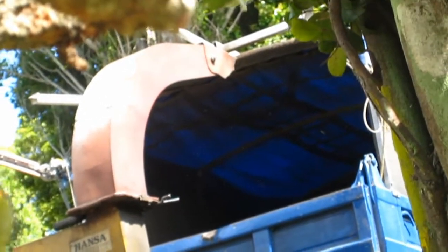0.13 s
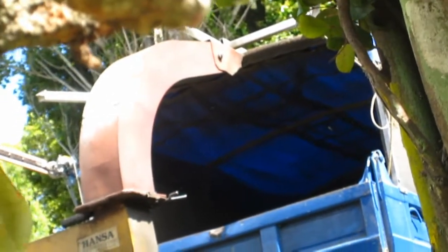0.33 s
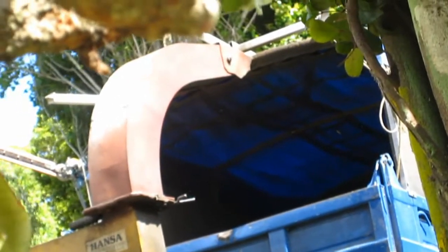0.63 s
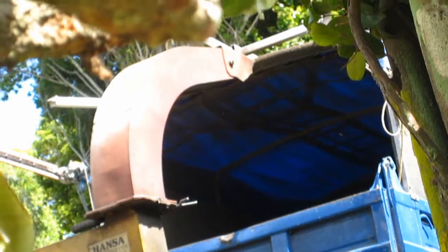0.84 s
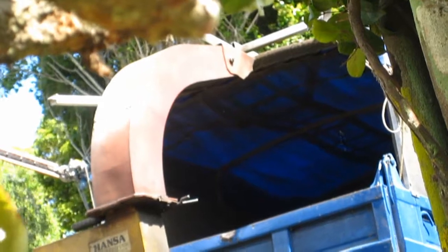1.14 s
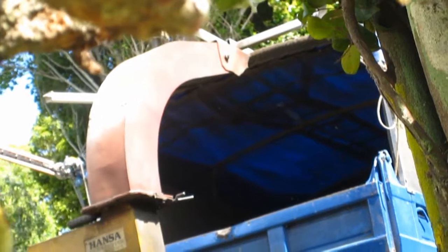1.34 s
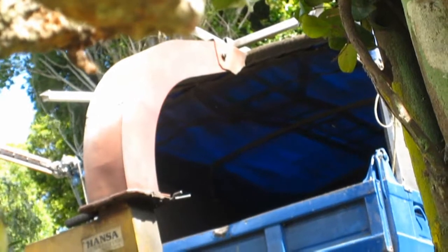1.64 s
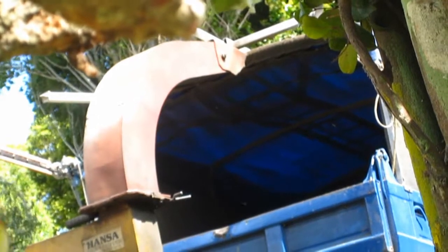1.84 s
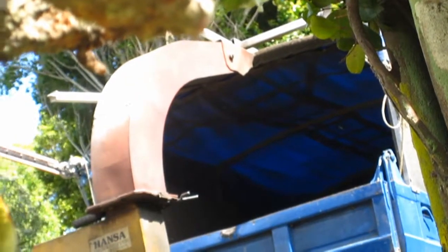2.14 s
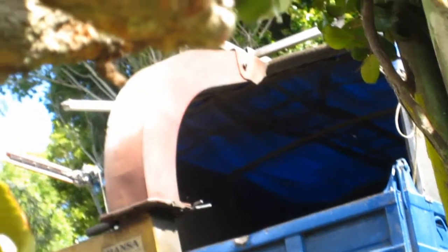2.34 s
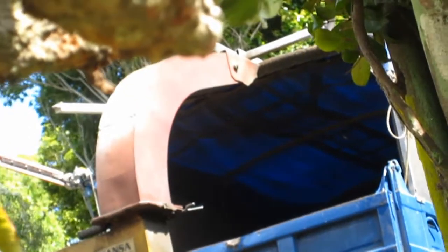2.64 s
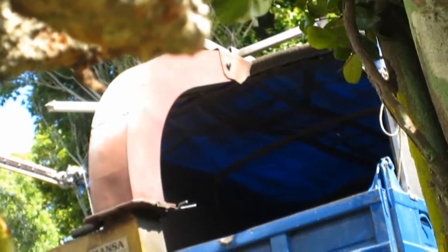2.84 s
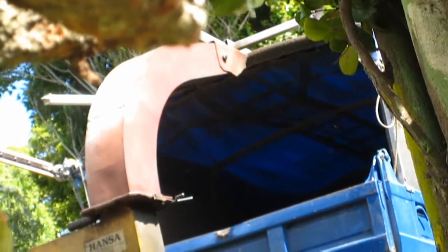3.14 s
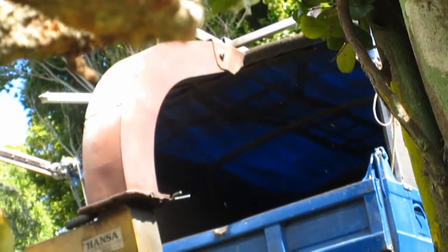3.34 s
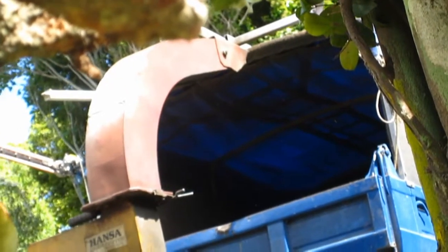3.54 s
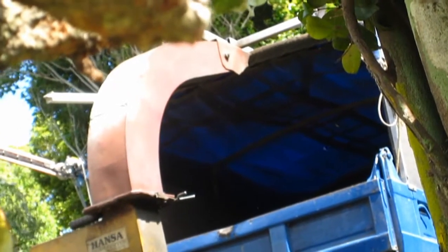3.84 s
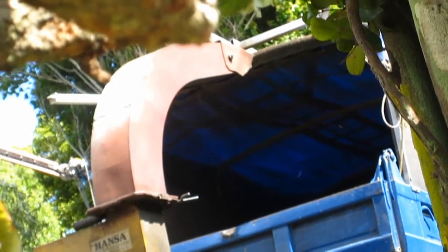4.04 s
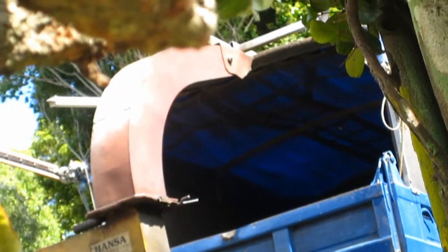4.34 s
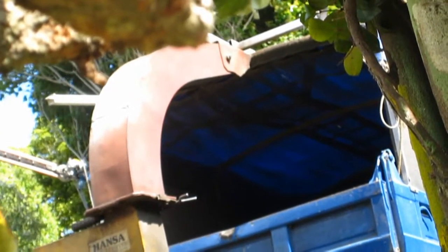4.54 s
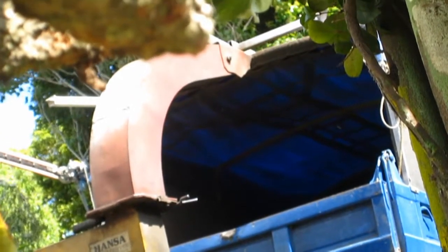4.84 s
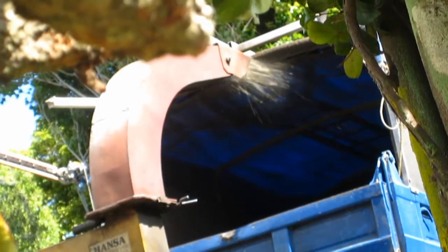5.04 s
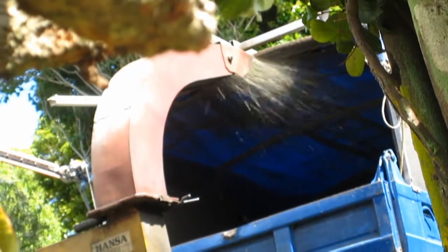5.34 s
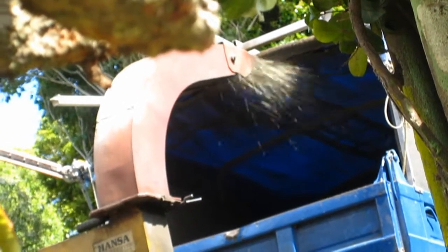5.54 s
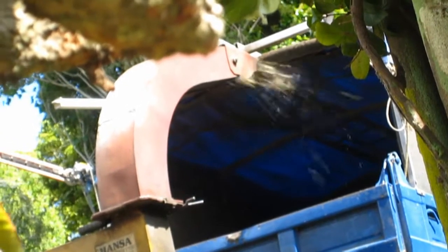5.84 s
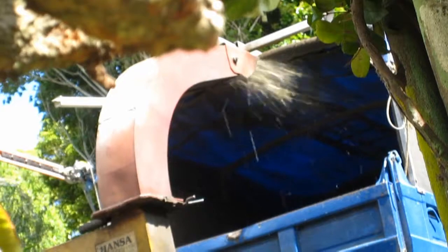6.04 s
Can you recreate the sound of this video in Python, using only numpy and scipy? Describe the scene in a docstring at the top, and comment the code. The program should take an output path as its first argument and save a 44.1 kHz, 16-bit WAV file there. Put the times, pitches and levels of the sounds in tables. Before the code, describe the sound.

Outdoors and close by, a wood chipper runs with a low, buzzing engine drone and paddle hum under roaring, hissing air. A knife clacks about thirty times a second, a bright, uneven metallic chatter. Near the end a branch knocks dully in the hopper, then is bitten with harsh crunches and sprays of chips cracking in the steel chute, while the drone ducks and slows slightly.

```python
"""A wood chipper runs outdoors: its two-cylinder engine drones, as a sum of multiples of the shaft speed,
and drives by belt a rotor whose paddles hum; noise shaped in frequency gives the air in the housing.
Once a turn the knife clacks on a stub of wood and excites steel modes; the covered truck bed answers.
Near the end a branch knocks in the hopper, chips spray and crack against the chute as noise bursts,
the machine slows a little, and an automatic gain control pushes the drone down."""
import sys
import numpy as np
from scipy import signal
from scipy.fft import rfft, irfft, next_fast_len
from scipy.io import wavfile
from scipy.ndimage import map_coordinates

SR = 44100
rng = np.random.default_rng(int(sys.argv[2]) if len(sys.argv) > 2 else 0)


def store_pcm(level_fs):
    """Save levels as 16-bit WAV."""
    pcm = np.round(np.clip(level_fs, -1, 1) * 32767).astype(np.int16)
    wavfile.write(sys.argv[1], SR, np.atleast_2d(pcm).T)


N = 273420

# rotor speed, nearly steady until the branch loads it: t/s, f/Hz
ROTOR_SPEED = [(0.0, 29.649), (0.9, 29.572), (2.4, 29.607), (3.2, 29.566), (4.2, 29.58), (4.9, 29.49),
               (5.7, 29.15), (6.2, 29.25)]
BELT_RATIO = 1.917  # turns of the engine shaft to one of the rotor

# multiples of the engine shaft speed in the exhaust: order, mean level/dB re firing tone
EXHAUST_ORDERS = [(1, -34), (3, -17), (4, -17), (5, -21), (5.5, -32), (6, -15), (8, -20), (10, -23),
                  (12, -33), (21, -32.5), (22, -32)]
# valve clatter spectrum: f/Hz, relative level/dB
CLATTER_SPECTRUM = [(580, -32), (720, -1.5), (950, 3.0), (1100, -6.0), (1230, 1.0), (1450, -13.5),
                    (1700, -2.5), (4000, -26)]
# multiples of the rotor speed in the paddle hum: order, mean level/dB re firing tone
PADDLE_ORDERS = [(1, -40), (2, -22), (3, -25), (4, -54), (5, -8), (6, -16.5), (7, -25.5), (8, -24.9),
                 (9, -12.5), (10, -15.5), (11, -34), (14, -30.5), (18, -23.5), (24, -31)]
FIRING_DB = -12.5  # dB rms ahead of the gain control
# seventh multiple of the shaft speed, which buzzes and fades on its own: t/s, level/dB
BUZZ_LEVEL = [(0, -25.5), (.5, -26.5), (.9, -34.5), (1.4, -27.5), (4, -26), (4.45, -22), (5.2, -27.5),
              (5.7, -49)]

# roar of air in the housing: t/s, level/dB
ROAR_LEVEL = [(0, -22.5), (2.4, -22), (3.4, -21), (4.05, -24), (4.5, -21.5), (6.2, -19.5)]
# spectra of the roar and of the hiss from the chute: f/Hz, relative level/dB per Hz
ROAR_SPECTRUM = [(20, -8), (45, -12), (75, -2), (115, 4.5), (200, -2.5), (290, 3), (400, -1), (600, -1.5),
                 (950, -5.5), (1450, -11), (2500, -10.5), (6000, -33)]
HISS_SPECTRUM = [(600, -14), (1500, -12), (2400, -1.5), (3400, 1), (4600, 0.5), (5800, -0.5), (7000, -3),
                 (9400, -2), (10200, -6), (12000, -16), (15500, -38)]

# how hard the wood presses on the knife: t/s, relative level/dB
KNIFE_FORCE = [(0, -13), (.3, -10.5), (.6, -13.5), (1.45, -11), (2.1, -14), (2.8, -11.5), (3.8, -11),
               (4.9, -11.5), (5.3, -6.5), (6.1, -9)]
# turns on which the stub jumps into the knife or bounces clear: t/s, level/dB re usual blow
STUB_JUMPS = [(.7, 3), (.74, 4), (.9, 4.5), (.97, 2), (1.11, -15), (1.21, 3.5), (2.12, -8), (2.26, -7),
              (2.43, -10), (2.86, 2.5), (2.9, -4), (2.97, 0), (3.27, -4), (4.22, 3), (4.35, 0), (4.39, -9),
              (4.49, -5), (5.27, 5), (6.02, 4)]
# share of a weak jump's lost dB that the next blow makes up; scatter of the other blows (dB)
REBOUND, BLOW_SCATTER_DB = 0.14, 1.0
# modes of the knife and housing: f/Hz, width/Hz, relative level/dB
STEEL_MODES = [(2220, 1800, -14), (3366, 290, 2), (3836, 183, 1.5), (4610, 290, -7), (5240, 530, -5),
               (6110, 590, 0), (7030, 690, -2), (7430, 640, 1.5), (8220, 580, -0.5), (9180, 510, -1.5),
               (10010, 780, -4)]
# treble roll-off of the ring: f/Hz, gain/dB
RING_TREBLE = [(10200, -2.5), (12000, -3.0), (16000, -20)]
# the stub rubbing on the disc: f/Hz, relative level/dB per Hz
SCRAPE_SPECTRUM = [(300, -12), (800, 2), (1400, -3), (2600, 0.5), (3500, 5), (4100, 4), (4800, 5),
                   (6000, -13), (7300, -32), (8700, 6), (10000, -5.5), (12000, -10.5), (16000, -33)]
# decay of sound in the truck bed: f/Hz, time to fall 60 dB/s
BED_DECAY = [(500, 0.26), (3500, 0.1), (10000, 0.087)]

# the branch knocks in the hopper on its way in: t/s, length/s, level/dB
HOPPER_KNOCKS = [(4.29, .1, -22), (4.515, 0.051, -28)]
KNOCK_RISE_S, KNOCK_FADE_S = 0.023, 0.057
# modes of the hopper's sheet steel: f/Hz, width/Hz, relative level/dB
HOPPER_MODES = [(470, 47, 3), (603, 70, -3), (750, 65, -1), (910, 70, -11)]

# lengths of branch pulled into the knife: t/s, length/s, spray level/dB, crunch level/dB
BRANCH_BITES = [(4.88, 0.09, -15, -26), (4.956, 0.091, -9, -21), (5.148, 0.078, -8, -8.5),
                (5.364, 0.15, -9.5, -16), (5.827, .08, -6.5, -11), (5.935, .06, -12.5, -22),
                (6.15, .08, -15, -15)]
# a bite takes hold at once; its crunch stops soon, while the chute takes longer to empty
GRIP_S, CRUNCH_FADE_S, SPRAY_FADE_S = .018, 0.099, 0.28
# spectra of the spray of chips and of the crunch: f/Hz, relative level/dB per Hz
SPRAY_SPECTRUM = [(800, -25), (1800, -5), (2600, -0.5), (3500, 0.5), (4500, 2), (5600, -5), (7500, -3),
                  (9700, -2), (12000, -16), (15500, -30)]
CRUNCH_SPECTRUM = [(400, -18), (1000, 1.5), (1800, -5), (3200, -1.5), (6000, -3), (12000, -44)]
# runs of big chips that crack against the chute: t/s, number of chips, relative level/dB
CRACK_RUNS = [(4.887, 1, -8), (5.171, 5, 0), (5.331, 1, -3), (5.402, 1, -5.5), (5.495, 1, -4),
              (5.857, 2, -3), (6.157, 3, -5)]
CRACK_GAP_S = .018
# tone of the cracks: f/Hz, gain/dB
CRACK_RESPONSE = [(300, -11), (1200, -1.0), (5500, 1.0), (10000, -17), (15000, -28)]

# what the gain control listens to: f/Hz, gain/dB
GAIN_SENSITIVITY = [(300, -5), (3000, 1), (9000, 0)]
# gain for quiet sound and the sensed level above which it turns down (dB)
OPEN_GAIN_DB, THRESHOLD_DB = 2.5, -13.5
SENSE_S, ATTACK_S, RELEASE_DB_PER_S = 0.0079, 0.0021, 34.5
TOP_HZ = 15750  # band limit


def amp(db):
    """Decibels to amplitude: 20 dB is a factor of ten."""
    return 10 ** (np.asarray(db) / 20)


def unit(x):
    """Normalisation: x at rms 1."""
    return x / np.sqrt(np.mean(x ** 2) + 1e-20)


def along(points, hz):
    """Logarithmic interpolation: (f/Hz, value) points read on a log axis."""
    f, v = np.transpose(points)
    return np.interp(np.log(hz + 1), np.log(f + 1), v)


def curves(rows):
    """Linear interpolation in time: one value per sample for each column after the time."""
    s, *cols = np.transpose(rows)
    return [np.interp(np.arange(N) / SR, s, c) for c in cols]


def wobble(rate):
    """Slow random modulation: a smooth curve with rate knots a second."""
    knots = rng.standard_normal(int(N * rate / SR) + 4)
    return map_coordinates(knots, [np.arange(N) * rate / SR])


def filtered(x, response):
    """Linear filtering: the spectrum of x times a response of frequency."""
    m = next_fast_len(N + SR // 2)
    return irfft(rfft(x, m) * response(np.fft.rfftfreq(m, 1 / SR)), m)[:N]


def coloured(x, spectrum):
    """Spectral shaping: x filtered by the given spectrum, at rms 1."""
    return unit(filtered(x, lambda hz: amp(along(spectrum, hz))))


def resonance(hz, centre, width):
    """Damped resonance: the response of one mode."""
    return 1j * hz * width / (centre ** 2 - hz ** 2 + 1j * hz * width)


def turning_noise(turns, alike):
    """Cyclic noise: the share alike of its power comes back on every turn."""
    size = int(N / (turns[-1] - turns[0]))
    again = map_coordinates(rng.standard_normal(size), [turns % 1 * size], mode="grid-wrap")
    alike = np.clip(alike, 0, 1)
    return np.sqrt(alike) * again + np.sqrt(1 - alike) * rng.standard_normal(N)


def burst(turns, start, rise, fall):
    """Periodic excitation: an envelope that swells and dies once a turn, times in turns, at rms 1."""
    age = (turns - start) % 1
    return unit((1 - np.exp(-age / rise)) * np.exp(-age / fall))


def swell(start, length, rise, fall):
    """Exponential build-up and decay: rises from start, dies away after length; times in seconds."""
    age = np.maximum(np.arange(N) / SR - start, 0)
    return (1 - np.exp(-age / rise)) * np.exp(-np.maximum(age - length, 0) / fall)


def grains(per_second, spread_db):
    """Random impacts: single-sample pulses at random moments and of random sizes."""
    struck = rng.random(N) < per_second / SR
    return struck * rng.standard_normal(N) * amp(spread_db * rng.standard_normal(N))


def tones(turns, orders, waver_db, lag):
    """Order synthesis: fluttering multiples of a shaft speed; dispersion in the duct smears each pulse."""
    out = 0
    for order, db in orders:
        level_db = db + waver_db * (wobble(1.99) + wobble(14))
        cycles = order * turns - lag * (order - 2) ** 2
        out = out + np.sqrt(2) * amp(level_db) * np.cos(2 * np.pi * cycles)
    return out


def engine(shaft):
    """Periodic combustion: exhaust overtones, and valve clatter repeating every second shaft turn."""
    clatter = coloured(turning_noise(shaft / 2, alike=1.0), CLATTER_SPECTRUM)
    return tones(shaft, EXHAUST_ORDERS, waver_db=1.0, lag=0.0206) + amp(-17.5) * clatter


def fan(rotor):
    """Blade passing: the paddles hum as they sweep past the outlet."""
    return tones(rotor, PADDLE_ORDERS, waver_db=0.68, lag=.035)


def buzz(shaft):
    """Amplitude modulation: the seventh multiple of the shaft speed swells and dies away."""
    return np.sqrt(2) * amp(curves(BUZZ_LEVEL)[0]) * np.cos(2 * np.pi * 7 * shaft)


def drone(shaft, rotor):
    """Superposition: the firing tone, two beats a turn, leads the exhaust overtones and paddle hum."""
    firing = np.sqrt(2) * np.cos(2 * np.pi * 2 * shaft)
    return amp(FIRING_DB) * (firing + engine(shaft) + fan(rotor)) + buzz(shaft)


def air(rotor):
    """Turbulence: air roars in the housing and hisses out of the chute as shaped noise."""
    gusts = rng.standard_normal(N) * amp(2.16 * wobble(90))
    roar = amp(curves(ROAR_LEVEL)[0]) * coloured(gusts, ROAR_SPECTRUM)
    hiss_level = amp(-20.0 + 0.94 * wobble(8))
    hiss = hiss_level * coloured(turning_noise(rotor, alike=0.27), HISS_SPECTRUM)
    return roar + hiss


def scrape(rotor):
    """Friction: the stub rubs on the disc from just before each blow."""
    rubbing = turning_noise(rotor, alike=0.49) * burst(rotor, start=-0.12, rise=0.038, fall=0.19)
    return amp(-26.5 + 3.3 * wobble(25)) * coloured(rubbing, SCRAPE_SPECTRUM)


def knife(rotor):
    """Impact excitation of modes: the knife strikes the stub once a turn and the steel rings."""
    turn = np.floor(rotor).astype(int)
    blow_db = BLOW_SCATTER_DB * rng.standard_normal(turn[-1] + 1)
    for s, db in STUB_JUMPS:
        jumped = round(rotor[int(s * SR)])
        blow_db[jumped] = db
        blow_db[jumped + 1] += REBOUND * max(-db, 0)
    blows = rng.standard_normal(N) * burst(rotor, start=0, rise=0.019, fall=0.044)
    ring = 0
    for k, (centre, width, db) in enumerate(STEEL_MODES):
        # the point of contact shifts, so each blow favours other modes
        contact_db = 1.77 * rng.standard_normal(turn[-1] + 1)[turn]
        share = amp(db + 0.88 * wobble(4.06) + contact_db)
        mode = filtered(blows * share, lambda hz: resonance(hz, centre, width))
        ring = ring + (-1) ** k * mode  # alternate signs keep neighbours from cancelling
    ring = filtered(ring, lambda hz: amp(along(RING_TREBLE, hz)))
    # nearly equal energy on every turn, so that the force and the blow's level set the loudness
    energy = np.bincount(turn, ring ** 2)
    ring = unit(ring / np.sqrt(energy + energy.mean() / 10)[turn])
    return amp(curves(KNIFE_FORCE)[0] + blow_db[turn] - 8.5) * ring


def truck_bed(x, size=4096):
    """Reverberation: the covered bed adds a short noise tail, drawn anew for each short piece of sound."""
    pieces = np.pad(x, (0, -N % size)).reshape(-1, size)
    hz, t, z = signal.stft(rng.standard_normal((len(pieces), SR // 4)), SR, nperseg=256)
    decay = amp(-60 * t / along(BED_DECAY, hz)[:, None])
    tails = signal.istft(z * decay, SR, nperseg=256)[1]
    tails = tails / np.linalg.norm(tails, axis=1, keepdims=True)
    answers = signal.fftconvolve(pieces, tails, axes=1)
    delay = int(.002 * SR)
    places = size * np.arange(len(pieces))[:, None] + np.arange(answers.shape[1]) + delay
    return np.bincount(places.ravel(), answers.ravel())[:N]


def hopper():
    """Random impacts on a plate: the branch knocks against the hopper's sheet steel with a short growl."""
    def plate(hz):
        return sum((-1) ** k * amp(db) * resonance(hz, centre, width)
                   for k, (centre, width, db) in enumerate(HOPPER_MODES))

    growl = unit(filtered(grains(394, spread_db=-1.0), plate))
    knocking = sum(amp(db) * swell(s, length, KNOCK_RISE_S, KNOCK_FADE_S)
                   for s, length, db in HOPPER_KNOCKS)
    return knocking * growl


def chips(rotor):
    """Granular impact noise: slices bitten off each turn pelt the steel chute in clumps."""
    # overlapping bites add in power
    spraying = np.linalg.norm([amp(db) * swell(s, length, GRIP_S, SPRAY_FADE_S)
                               for s, length, db, _ in BRANCH_BITES], axis=0)
    crunching = np.linalg.norm([amp(db) * swell(s, length, GRIP_S, CRUNCH_FADE_S)
                                for s, length, _, db in BRANCH_BITES], axis=0)
    slices = unit(1 + 0.16 * burst(rotor, start=0.024, rise=.05, fall=0.77))
    clumps = amp(1.7 * wobble(170) + 0.7 * wobble(25))
    pelting = turning_noise(rotor, alike=0.12) * amp(1.9 * wobble(2500))
    spray = coloured(pelting * slices * clumps, SPRAY_SPECTRUM)
    crunch = coloured(grains(3000, spread_db=1.5) * slices * clumps, CRUNCH_SPECTRUM)
    return spraying * spray + crunching * crunch


def cracks(count=24):
    """Impulsive modal excitation: big chips hit the chute in quick runs, each with new short modes."""
    out, t = np.zeros(N + SR), np.arange(SR // 20) / SR
    for s, number, db in CRACK_RUNS:
        for k in range(round(number)):
            pitch = 3700 * np.exp(.33 * rng.standard_normal((count, 1)))
            modes = unit(np.sin(2 * np.pi * (pitch * t + rng.random((count, 1)))).sum(0))
            rattle = modes + 1.3 * rng.standard_normal(len(t))
            first = round((s + k * CRACK_GAP_S) * SR)
            out[first:][:len(t)] += amp(db - 60 * t / 0.022) * rattle  # falls 60 dB in 22 ms
    return filtered(out[:N], lambda hz: amp(along(CRACK_RESPONSE, hz)))


def lagged(x, seconds):
    """First-order relaxation: x followed with the given time constant."""
    keep = np.exp(-1 / (seconds * SR))
    return signal.lfilter([1 - keep], [1, -keep], x, zi=[keep * x[:SR // 20].mean()])[0]


def gain_control(x):
    """Feed-forward limiting: loud sound turns the gain down fast and it creeps back, ducking the drone."""
    sensed = filtered(x, lambda hz: amp(along(GAIN_SENSITIVITY, hz)))
    sensed_db = 10 * np.log10(lagged(sensed ** 2, SENSE_S) + 1e-12)
    over_db = np.maximum(sensed_db - THRESHOLD_DB, 0)
    # hold each peak, then let it fall at the release rate
    recovery_db = RELEASE_DB_PER_S * np.arange(N) / SR
    held_db = np.maximum.accumulate(over_db + recovery_db) - recovery_db
    return x * amp(OPEN_GAIN_DB - lagged(held_db, ATTACK_S))


def scene():
    """Common drive: the engine and its belted rotor time the sounds; the truck bed answers the clacks."""
    turns = np.cumsum(curves(ROTOR_SPEED)[0]) / SR
    shaft = BELT_RATIO * turns - .16
    rotor = turns + .238
    machine = drone(shaft, rotor) + air(rotor)
    clack = knife(rotor) + scrape(rotor) + cracks()
    answer = amp(-1.5) * truck_bed(clack)
    return (machine + clack + answer + hopper() + chips(rotor))[None]


def record(dry):
    """Saturation and band limiting: after the gain control, peaks round off at full scale."""
    hardness = 8  # a higher exponent bends more sharply
    x = gain_control(dry[0])
    rounded = x / (1 + np.abs(x) ** hardness) ** (1 / hardness)
    return filtered(rounded, lambda hz: hz < TOP_HZ)[None]


dry = scene()
out = record(dry)
store_pcm(out)
```